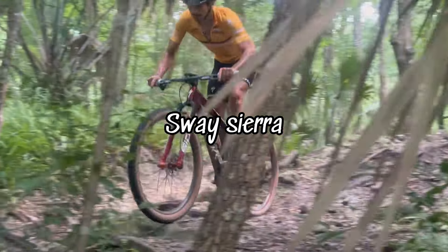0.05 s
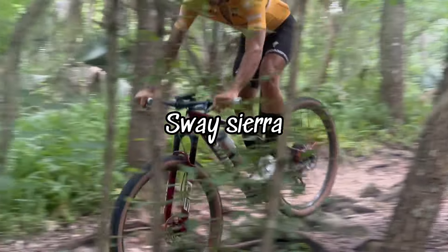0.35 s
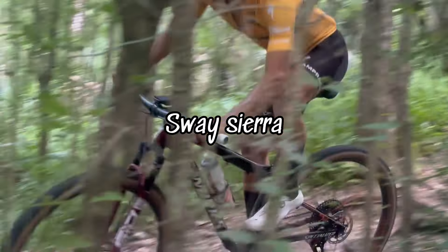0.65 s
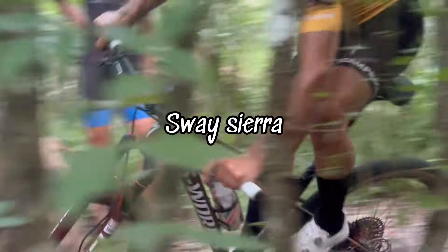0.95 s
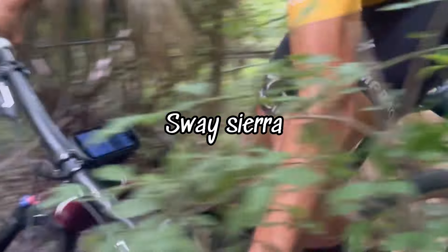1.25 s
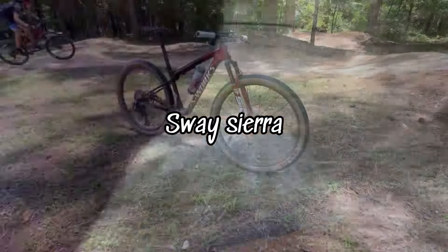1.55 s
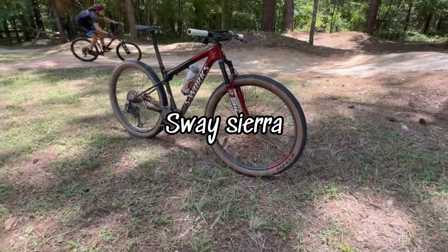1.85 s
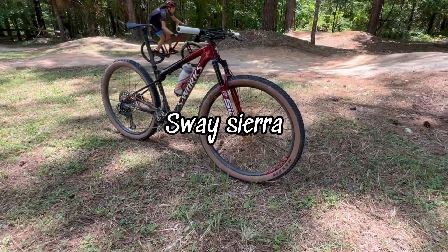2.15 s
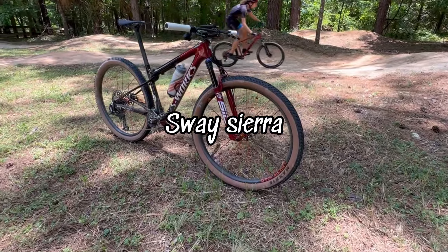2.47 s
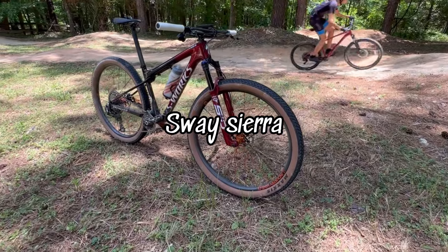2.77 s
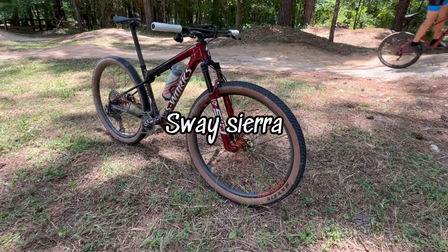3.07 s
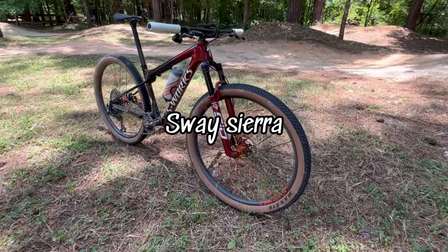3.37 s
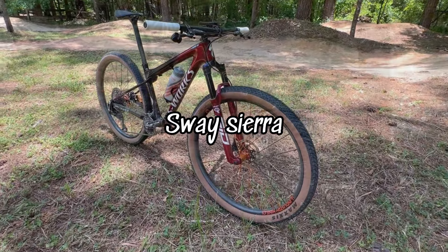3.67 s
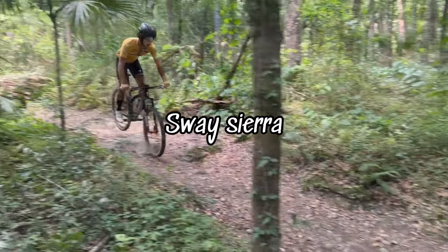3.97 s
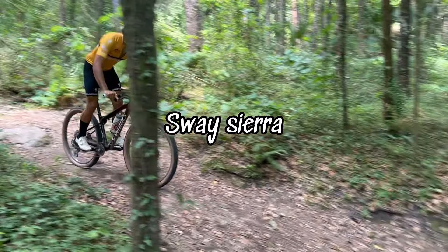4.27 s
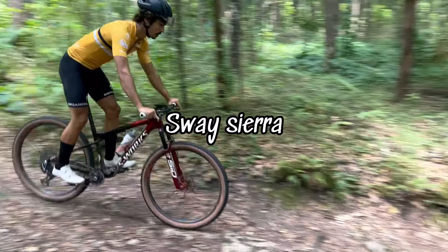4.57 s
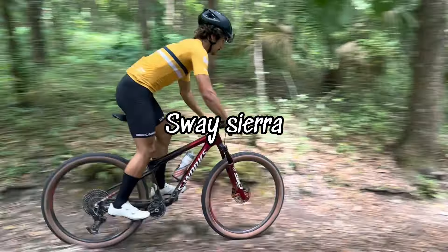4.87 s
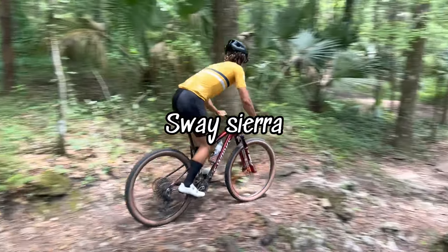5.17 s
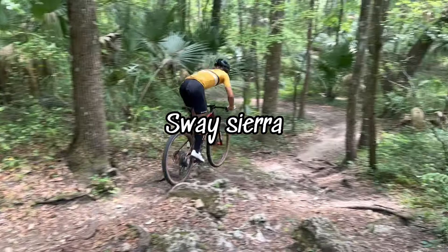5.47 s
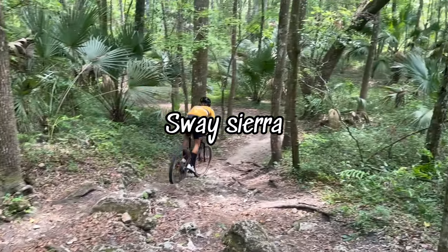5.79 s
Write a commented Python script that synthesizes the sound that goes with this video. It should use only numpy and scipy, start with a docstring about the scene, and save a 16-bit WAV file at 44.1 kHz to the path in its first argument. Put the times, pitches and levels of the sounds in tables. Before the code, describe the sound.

A mountain bike coasts close past the microphone on a forest trail, tyres rumbling and crunching grit, freehub buzzing, frame and chain clattering over roots. In a short lull, a farther bike rolls and ticks faintly while twigs snap under soft air in the leaves. Then comes a second close pass through dry leaves, with one very hard knock and thump before it fades.

```python
"""Mountain bikes on a forest trail

A bike coasts past twice: tyres rumble on dirt and crush grit, the freehub's pawls buzz, and roots
make the tyres thump and the frame clatter, once very hard. Twigs snap and the trees echo the hits.
In the lull a farther bike ticks across a clearing, under soft canopy air and a faint low rumble.
The second pass runs through dry leaves, with thin, brief metallic rings from the bike."""
import sys
import numpy as np
from scipy import signal
from scipy.fft import rfft, irfft, next_fast_len
from scipy.io import wavfile
from scipy.ndimage import uniform_filter1d, map_coordinates

SR = 44100
rng = np.random.default_rng(int(sys.argv[2]) if len(sys.argv) > 2 else 0)


def dump(signal):
    """Clip the signal to [-1, 1] and save it as 16-bit WAV at the path in sys.argv[1]."""
    limited = np.clip(np.atleast_2d(signal).T, -1, 1)
    pcm = np.round(limited * 32767).astype(np.int16)
    wavfile.write(sys.argv[1], SR, pcm)


N = 257103
TIME_S = np.arange(N) / SR


def amp(db):
    """Decibels to gain."""
    return 10 ** (np.asarray(db) / 20)


def unit(x):
    """Scale to rms 1."""
    return x / np.sqrt(np.mean(x ** 2) + 1e-20)


def along(points, hz):
    """Interpolate (Hz, value) points on a log frequency axis."""
    points_hz, values = np.transpose(points)
    return np.interp(np.log(hz + 1), np.log(points_hz), values)


def noise():
    """Two unrelated white noises."""
    return rng.standard_normal((2, N))


def grains(per_s, scatter_db):
    """Two streams of tiny random impacts of uneven size."""
    impacts = (rng.random((2, N)) < per_s / SR) * rng.choice([-1, 1], (2, N))
    return unit(impacts * amp(scatter_db * np.minimum(rng.exponential(size=(2, N)), 3)))


def wobble(per_s):
    """A smooth curve through per_s random knots a second."""
    return map_coordinates(rng.standard_normal(int(N * per_s / SR) + 4), [TIME_S * per_s])


def spell(start, end, edge_s):
    """Gate from start to end, with a ramp centred on each."""
    return np.clip(np.minimum(TIME_S - start, end - TIME_S) / edge_s + 0.5, 0, 1)


def add(track, start, sound):
    """Mix a sound in at start seconds."""
    part = track[..., max(round(start * SR), 0):][..., :sound.shape[-1]]
    part += sound[..., :part.shape[-1]]


def filtered(x, response):
    """Filter x by a function of frequency."""
    n = x.shape[-1]
    padded = next_fast_len(n + 8192)
    return irfft(rfft(x, padded) * response(np.fft.rfftfreq(padded, 1 / SR)), padded)[..., :n]


def coloured(x, spectrum):
    """Shape x by a (Hz, dB) spectrum, at rms 1."""
    return unit(filtered(x, lambda hz: amp(along(spectrum, hz))))


def resonance(hz, centre_hz, width_hz):
    """Causal response of one mode."""
    return 1j * hz * width_hz / (centre_hz ** 2 - hz ** 2 + 1j * hz * width_hz)


def band(x, centre_hz, width_hz):
    """Pass x twice through a resonance, at rms 1."""
    return unit(filtered(x, lambda hz: resonance(hz, centre_hz, width_hz) ** 2))


def spread(pair, likeness):
    """Mix two unrelated signals into left and right with a (Hz, correlation) curve."""
    def weights(hz):
        angle = np.arccos(np.clip(along(likeness, hz), -1, 1)) / 2
        return np.array([np.cos(angle), np.sin(angle)])
    mid, side = filtered(pair, weights)
    return np.array([mid + side, mid - side])


def patchy(x, depth_db):
    """Colour that shifts from moment to moment, as paths through the trees change."""
    spectra = signal.stft(x, nperseg=1024)[2]
    patches = uniform_filter1d(rng.standard_normal(spectra.shape[1:]), size=5, axis=0)
    patches = unit(uniform_filter1d(patches, size=7, axis=1))
    return signal.istft(spectra * amp(depth_db * patches), nperseg=1024)[1][:, :N]


def nearness(nearest_s, width_s):
    """One over distance for a bike riding straight by, 1 at its nearest."""
    return 1 / np.hypot(1, (TIME_S - nearest_s) / width_s)


# Ground patches. Each row: centre in seconds, half length in seconds, tyre load in dB, extra grit in dB.
GROUND = [(0.381, 0.027, -1.5, 3), (0.559, 0.075, 1.5, 5.5), (0.77, 0.26, 0, 0), (1.19, 0.09, 2, 2),
          (2.07, 0.08, -9.5, 11.5), (3.75, 0.0765, 10.5, -29.5), (4.062, 0.1386, 4.5, 5),
          (4.257, 0.113, 6, -1), (4.725, 0.094, 2.5, -1.5), (5.114, 0.053, -3, 4),
          (5.291, 0.0645, 11.5, -7), (5.711, 0.0214, -3.5, 8.5), (5.805, 0.0953, 10.5, -3.5)]
# Wheels going light. Each row: lift in seconds, touchdown in seconds, tread loss by then in dB.
HOPS = [(0.064, 0.371, 15), (3.838, 4.014, 28.5), (5.375, 5.682, 27.5)]

def contact(ride):
    """Gains of rumble, tread and grit on one pass, set by distance, rough ground and hops."""
    start, end, nearest_s, width_s = ride[:4]
    fade_s = 0.932
    fade = np.clip(np.minimum(TIME_S - start, end - TIME_S) / fade_s, 0, 1)
    load_db = loose_db = lift_db = 0
    for centre_s, half_s, press_db, grit_db in GROUND:
        patch = np.exp(-((TIME_S - centre_s) / half_s) ** 2)
        load_db += press_db * patch
        loose_db += grit_db * patch
    for up, down, loss_db in HOPS:
        lift_db += loss_db * np.clip((TIME_S - up) / (down - up), 0, 1) * spell(up, down, edge_s=0.011)
    gains = amp([load_db - 0.53 * lift_db, load_db - lift_db, load_db + loose_db - 0.365 * lift_db])
    return fade * nearness(nearest_s, width_s) * gains


# The near bike. Each row: start, end, nearest moment and distance over speed in seconds,
# then rumble, tread and grit in dB.
PASSES = [(-0.8958, 2.278, 1.141, 0.339, -39.5, -37, -41.5), (3.5, 6.718, 4.9293, 0.3216, -43, -39.5, -42)]
# Tyre spectra; tread and grit have one per pass. Each row: frequency in Hz, relative level in dB.
RUMBLE_SPECTRUM = [(12, -76), (22, -36), (32, -21), (52, -1), (110, 2), (170, -4.5), (260, -12.5),
                   (500, -20.5), (1200, -70.5)]
TREAD_SPECTRA = [
    [(30, -70), (80, -4.5), (170, -9), (250, 7.5), (370, -1), (460, 1), (700, 0.5), (1100, -8.5),
     (1800, -16.5), (5000, -28.5)],
    [(30, -72), (80, -35.5), (170, -11), (260, 3), (380, -6.5), (450, -2), (720, -2), (1100, -10),
     (1800, -23), (5000, -55.5)],
]
GRIT_SPECTRA = [
    [(100, -60.5), (500, -18), (1100, 10), (1350, 4), (1550, 9), (1900, 7.5), (2700, 1.5), (3600, 0),
     (6000, -4.5), (10000, -5.5), (16000, -5.5)],
    [(100, -60), (500, -62.5), (1100, 1.5), (1500, -2), (2100, 2.5), (2600, 3.5), (3700, -6), (5000, -11),
     (9000, -5.5), (16000, -28.5)],
]
# Stereo image, head-on then side-on. Each row: frequency in Hz, left-right correlation.
PASS_LIKENESS = [
    [(100, 0.992), (600, 0.948), (1100, 0.89), (1800, 0.033), (2400, 1), (6900, 1), (7500, -0.93),
     (8100, 0.99), (10000, -0.63)],
    [(100, 1), (250, 0.938), (650, 0.878), (1400, 0.77), (2400, 0.13), (6000, 0.064), (8500, 0.435)],
]

def tyres():
    """Knobs drum on uneven dirt and crush grit; every jolt presses the tread harder."""
    jolt = amp(1.4 * wobble(70))
    out = np.zeros((2, N))
    for i, ride in enumerate(PASSES):
        rumble, tread, grit = contact(ride) * amp(ride[4:])[:, None]
        knobs = noise() + 0.9 * grains(450, scatter_db=4)
        crumbs = noise() + 0.468 * grains(400, scatter_db=0.5)
        roll = rumble * amp(0.8 * wobble(25)) * coloured(noise(), RUMBLE_SPECTRUM)
        roll += tread * amp(1.57 * wobble(40)) * coloured(knobs, TREAD_SPECTRA[i])
        roll += grit * amp(1.95 * wobble(130)) * coloured(crumbs, GRIT_SPECTRA[i])
        out += spread(roll, PASS_LIKENESS[i])
    return patchy(jolt * out, depth_db=1.1)


def stone_crackle():
    """Single stones crack under the knobs on the first pass, each in a short, bright burst."""
    t = np.arange(SR // 80) / SR
    t60_s = 0.009
    stones = np.abs(grains(70, scatter_db=4.5)[0])
    bursts = signal.fftconvolve(stones, amp(-60 * t / t60_s))[:N]
    cracks = band(bursts * noise(), centre_hz=4750, width_hz=3740)
    grit = contact(PASSES[0])[2]
    return amp(-53) * grit * spread(cracks, PASS_LIKENESS[0])


def ratchet(rate_hz, t60_s):
    """Pawls drop off the teeth; each drop is a short burst of its own strength."""
    tooth = np.cumsum(rate_hz) / SR
    strength = amp(2 * rng.standard_normal(8192))[tooth.astype(int) % 8192]
    since_drop_s = (tooth % 1) / rate_hz
    return unit(noise() * strength * amp(-60 * since_drop_s / t60_s))


# Spells of coasting. Each row: start and end in seconds, level midway in dB, drift in dB per second,
# hub shell offset in dB, fade in seconds.
COASTS = [(-0.05, 0.419, -40, 18, -13, 0.035), (0.432, 0.47, -39, 0, -21, 0.0305),
          (0.47, 0.53, -51.5, 0, -14, 0.03), (0.527, 1.395, -40.5, -9, -11, 0.032),
          (1.385, 1.715, -54.5, -9, -9.5, 0.135), (1.683, 1.922, -60, 4, -16.5, 0.114),
          (1.916, 2.042, -51.5, -2.5, -18, 0.077), (3.45, 4.203, -49.5, 23, -7, 0.094),
          (4.197, 5.354, -42.5, -0.5, -12.5, 0.06), (5.34, 5.893, -42, -6, -8.5, 0.1)]
# Pawl sizzle. Each row: frequency in Hz, relative level in dB.
HUB_SPECTRUM = [(1200, -55.5), (3300, -30.5), (4500, -13.5), (6500, -7), (8400, -3.5), (10000, -5),
                (12200, -3.5), (14000, 2.5), (15000, 4.5), (16000, 1)]
# Hub stereo image. Each row: frequency in Hz, left-right correlation.
HUB_LIKENESS = [(2500, 0.84), (5500, 1), (7300, 0.099), (8500, 0.63), (10500, 0), (14000, 0)]

def freehub():
    """At speed the clicks merge into a sizzle, blurred by the trees; the hub shell sings along."""
    falloff = 0.847  # fades with distance more slowly than the tyres
    near = np.max([nearness(*ride[2:4]) for ride in PASSES], axis=0) ** falloff
    buzz, singing = np.zeros(N), np.zeros(N)
    for start, end, db, db_per_s, shell_db, fade_s in COASTS:
        drift_db = db_per_s * (TIME_S - (start + end) / 2)
        level = near * spell(start, end, fade_s) * amp(db + drift_db)
        buzz += level
        singing += level * amp(shell_db)
    clicks = ratchet(rate_hz=155 * (1 + 0.08 * wobble(5)), t60_s=0.012) + 1.2 * noise()
    blurred = patchy(clicks, depth_db=1.1)
    sizzle = amp(5 + 1.03 * wobble(45)) * buzz * coloured(blurred, HUB_SPECTRUM)
    shell = amp(1.74 * wobble(8.6)) * singing * band(clicks, centre_hz=2401, width_hz=660)
    return spread(sizzle + shell, HUB_LIKENESS)


# Canopy air. Each row: frequency in Hz, relative level in dB.
CANOPY_SPECTRUM = [(25, -60), (90, -25.5), (250, 4.5), (500, -1.5), (1100, 2.5), (1500, 0), (2100, -4),
                   (2600, 3.5), (3400, -2), (5000, -0.5), (7000, 3), (9000, -1.5), (12000, -25),
                   (16000, -28.5)]
# Stereo image of distant sounds. Each row: frequency in Hz, left-right correlation.
FAR_LIKENESS = [(150, 0.15), (400, 0.585), (1000, 0.14), (2400, 0.073), (15000, 0.015)]

def canopy():
    """Soft air moves through the leaves overhead."""
    leaves = patchy(noise(), depth_db=1.8)
    air = amp(-54 + 1.07 * wobble(4.465)) * coloured(leaves, CANOPY_SPECTRUM)
    return spread(air, FAR_LIKENESS)


def rattles():
    """Small random knocks that follow the tread's level, as rows for knocks()."""
    count, per_s, t60_s = 256, 19, 0.034
    tread = sum(contact(ride)[1] * amp(ride[5]) for ride in PASSES)
    timing, size, pitch = rng.random((count, 3)).T
    starts = (np.arange(count) + timing) / per_s
    tread_db = 20 * np.log10(np.interp(starts, TIME_S, tread) + 1e-9)
    levels_db = tread_db - 5 + 6 * size
    parts_hz = 400 * 4 ** pitch
    return [(s, db, t60_s, hz, db) for s, db, hz in zip(starts, levels_db, parts_hz) if s * SR < N]


# Blows from roots. Each row: start in seconds, strength in dB, chain rattle t60 in seconds,
# struck part's pitch in Hz, its ring in dB.
KNOCKS = [(0.37, -38.5, 0.028, 621, -39.5), (0.444, -31.5, 0.0333, 655, -31.5),
          (0.497, -35, 0.02, 626, -28), (0.513, -23.5, 0.0796, 970, -21.5), (0.522, -17, 0.05, 2308, -22.5),
          (0.524, -27, 0.0204, 677, -20), (0.534, -16.5, 0.0106, 263.6, -20.5),
          (0.592, -23.5, 0.022, 801, -32.5), (0.653, -27, 0.0262, 850, -33), (0.711, -30, 0.024, 696, -30),
          (0.723, -22, 0.0392, 593, -31), (0.733, -26, 0.0158, 1845, -25),
          (0.802, -22.5, 0.03, 613.4, -26.5), (0.814, -29.5, 0.022, 686, -30.5),
          (0.881, -19.5, 0.0154, 1412, -30), (0.953, -27.5, 0.0204, 665, -24),
          (0.967, -28, 0.081, 1830, -28.5), (1.030, -27, 0.039, 431.5, -24),
          (1.046, -26, 0.0416, 409, -28.5), (1.069, -21, 0.028, 523, -24),
          (1.099, -20.5, 0.0243, 1457, -26), (1.149, -24.5, 0.0304, 681, -25.5),
          (1.164, -34.5, 0.045, 301.6, -18.5), (1.226, -31.5, 0.028, 525, -20.5),
          (1.244, -25.5, 0.0265, 467, -21), (1.258, -25.5, 0.039, 270.4, -17),
          (1.268, -29, 0.027, 506, -27), (1.515, -29, 0.031, 379, -27.5), (1.710, -40, 0.0285, 604, -36),
          (1.756, -42.5, 0.019, 442, -39), (4.197, -27, 0.05, 484, -22), (4.322, -31, 0.0373, 437.5, -27.5),
          (4.348, -33.5, 0.039, 602, -27), (4.476, -31, 0.021, 633, -32.5), (4.572, -37, 0.031, 614, -27),
          (4.678, -28.5, 0.023, 893, -30), (4.772, -27.5, 0.0306, 785, -29.5),
          (4.855, -36, 0.03, 646, -30.5), (4.979, -28, 0.027, 613, -27.5), (5.253, -30.5, 0.108, 670, -22),
          (5.273, -14, 0.0222, 250, -12), (5.277, -5.5, 0.0366, 1346, -14.5),
          (5.284, -14, 0.0148, 690, -22), (5.817, -26, 0.065, 453, -32.5)]
# Frame modes. Each row: frequency in Hz, width in Hz, relative level in dB.
FRAME_MODES = [(267, 82.4, 20.5), (388, 135, 6.5), (701.4, 124, 15), (960, 20, -30), (1272.6, 28.5, 5.5),
               (1500, 32, 3), (1880, 157, 9.5), (2440, 66, -23), (2850, 95, -18), (3200, 79, -17.5),
               (4640, 510, -46), (5960, 120, -15)]
# Chain rattle. Each row: frequency in Hz, relative level in dB.
CHAIN_SPECTRUM = [(30, -39.5), (100, 11), (250, 2), (700, 3.5), (1000, 3), (1400, 5.5), (2000, 0.5),
                  (2800, 2.5), (3800, -13.5), (5400, -23), (7500, -59), (16000, -36)]

def knocks():
    """Each blow rings the frame and the part it strikes, and shakes a short rattle out of the chain."""
    def frame_response(hz):
        return sum((-1) ** k * amp(db) * resonance(hz, mode_hz, width_hz)
                   for k, (mode_hz, width_hz, db) in enumerate(FRAME_MODES))
    t = np.arange(SR // 4) / SR
    part_t60_s = 0.0433
    frame = filtered(1.0 * (t == 0), frame_response)
    frame /= np.abs(frame).max()
    blows, shake = np.zeros(N), np.zeros(N)
    for start, db, t60_s, part_hz, part_db in KNOCKS + rattles():
        add(blows, start + 0.002, amp(db - 1) * frame)
        part_envelope = amp(part_db - 60 * t / part_t60_s) * (1 - np.exp(-t / 0.00155))
        add(blows, start, part_envelope * np.sin(2 * np.pi * part_hz * t))
        add(shake, start - 0.0005, amp(db - 2 - 60 * t / t60_s) * (1 - np.exp(-t / 0.0016)))
    chain = shake * coloured(noise(), CHAIN_SPECTRUM)
    return blows + spread(chain, [(800, 1.0), (1300, 0.37), (1800, 0.68), (2500, 0.157), (4000, 0.145)])


# Echo decay. Each row: frequency in Hz, t60 in seconds.
ECHO_DECAY = [(200, 0.08), (2000, 0.459), (12000, 0.155)]

def trunk_echo(x):
    """Trees scatter a thin, short echo."""
    hz, t, spectra = signal.stft(rng.standard_normal((2, SR // 2)), SR, nperseg=256)
    decay = amp(-60 * t / along(ECHO_DECAY, hz)[:, None])
    tail = signal.istft(spectra * decay, SR, nperseg=256)[1]
    return signal.fftconvolve(x, tail / np.linalg.norm(tail[0]), axes=1)[:, :N]


# Tyre landings. Each row: start in seconds, level in dB, settled pitch in Hz, t60 in seconds,
# pitch sag time in seconds.
THUMPS = [(0.165, -20, 103.4, 0.0965, 0.01695), (0.203, -25, 100.3, 0.053, 0.0043),
          (0.533, -15, 118.4, 0.0634, 0.00702), (1.098, -15, 118, 0.04, 0.00554),
          (1.446, -18.5, 129.8, 0.0615, 0.0154), (4.203, -23.5, 84.9, 0.075, 0.00416),
          (4.922, -26, 80, 0.126, 0.00201), (5.275, -9, 124, 0.11, 0.005004),
          (5.309, -16, 81.4, 0.077, 0.0019), (5.340, -26, 142, 0.22, 0.00179),
          (5.817, -10, 83.1, 0.035, 0.00345)]

def thumps():
    """A squashed tyre booms; its pitch sags as the load comes off."""
    t = np.arange(SR // 2) / SR
    attack = 1 - np.exp(-t / 0.00774)
    out = np.zeros(N)
    for start, db, settled_hz, t60_s, sag_s in THUMPS:
        pitch_hz = settled_hz * (1 + 1.588 * np.exp(-t / sag_s))
        phase = 2 * np.pi * np.cumsum(pitch_hz) / SR
        boom = np.sin(phase) + 0.349 * np.sin(1.8 * phase) + 0.4 * np.sin(0.449 * phase)
        add(out, start, amp(db - 60 * t / t60_s) * attack * boom)
    return out


# Twigs and stones, and at 5.278 s the bright crack of the hardest blow. Each row: start in seconds, body in Hz,
# body in dB, edge in Hz, edge in dB, # edge width over its pitch, crumble t60 in seconds.
SNAPS = [(0.398, 854, -42.5, 4500, -45, 0.7, 0.048), (0.455, 1100, -32.5, 5000, -43, 0.74, 0.031),
         (0.968, 1880, -37.5, 3460, -37, 0.63, 0.031), (1.044, 1990, -35.5, 6000, -38, 0.75, 0.037),
         (1.069, 1500, -33.5, 2950, -47.5, 0.69, 0.023), (1.247, 2400, -38, 5640, -35, 1, 0.063),
         (1.419, 2300, -38, 6800, -31, 0.72, 0.025), (1.610, 1890, -34, 5200, -33, 1.57, 0.037),
         (2.850, 850, -39, 2900, -45, 0.81, 0.127), (2.869, 858, -35, 2740, -36.5, 0.9, 0.0426),
         (3.041, 5000, -51, 9400, -44, 1.0, 0.0096), (3.27, 513, -50, 3010, -55.5, 0.77, 0.045),
         (3.288, 1240, -40.5, 4040, -36, 0.313, 0.0155), (3.415, 1400, -49.5, 3900, -44.5, 0.9, 0.032),
         (3.522, 1400, -51.5, 4700, -39.5, 0.7, 0.0237), (3.734, 2500, -46, 5480, -40, 0.44, 0.072),
         (3.984, 1270, -50.5, 4530, -43, 1.3, 0.042), (4.213, 1265, -33.5, 5470, -27.5, 0.96, 0.117),
         (5.278, 1800, -23, 4880, -23.5, 0.48, 0.025), (5.314, 1300, -30, 2700, -32, 0.73, 0.047),
         (5.329, 2580, -30, 5460, -31.5, 0.69, 0.105), (5.356, 1300, -34.5, 3000, -37.5, 0.83, 0.066),
         (5.817, 1250, -43, 6260, -35.5, 0.86, 0.047)]

def snaps():
    """Dry twigs and small stones crack with a woody body and a bright edge, then crumble; the hardest blow of
    the frame cracks the same way."""
    t = np.arange(SR // 5) / SR
    out = np.zeros((2, N))
    for start, body_hz, body_db, edge_hz, edge_db, edge_width, t60_s in SNAPS:
        envelope = amp(-60 * t / 0.007) + 0.45 * amp(-60 * t / t60_s)
        burst = rng.standard_normal((2, len(t))) * envelope
        for centre_hz, db, width in ((body_hz, body_db, 1.2), (edge_hz, edge_db, edge_width)):
            crack = filtered(burst, lambda hz: resonance(hz, centre_hz, width * centre_hz) ** 3)
            onset_rms = np.sqrt(np.mean(crack[:, t < 0.003] ** 2))
            add(out, start, amp(db) * crack / onset_rms)
    return spread(out, [(1000, 1.0), (4000, 0.43)])


# The far bike's hub and tyres. Each row: frequency in Hz, relative level in dB.
FAR_HUB_SPECTRUM = [(300, -59.5), (1500, -4), (4000, 0.5), (6300, 8.5), (7700, -24), (9500, -5.5),
                    (12000, -11.5), (14000, -20), (16000, -19.5)]
FAR_TYRE_SPECTRUM = [(40, -68), (110, -38), (170, -10), (240, -2.5), (370, 0), (530, -3.5), (680, -2),
                     (1100, -17), (1800, -8), (6000, -19.5)]

def far_bike():
    """Across the clearing tyres roll, knobs hum on hard dirt and the hub sizzles through the trees."""
    passing = spell(1.05, 3.645, edge_s=0.55) * nearness(nearest_s=2.78, width_s=0.36)
    sizzle = amp(-59.5 + 1.4 * wobble(6.1)) * coloured(noise(), FAR_HUB_SPECTRUM)
    roll = amp(-53) * coloured(patchy(noise(), depth_db=0.5), FAR_TYRE_SPECTRUM)
    hum = amp(-56.5) * band(noise(), centre_hz=450.2, width_hz=50)
    return spread(passing * (sizzle + roll + hum), FAR_LIKENESS)


# Runs of ticks. Each row: start and end in seconds, ticks per second, slowing as a share per second,
# level in dB, centre in Hz, width in Hz.
TICK_RUNS = [(2.115, 2.306, 46, 0, -48.5, 7870, 3500), (2.511, 2.619, 39, 0, -48, 10000, 9500),
             (2.626, 2.86, 48, 0, -44.5, 9800, 10000), (3.017, 3.173, 32, 0, -50.5, 9500, 7900),
             (3.197, 3.53, 36, 0.6, -47, 9500, 9000)]

def far_ticks():
    """The slow wheel drops its pawls one by one: uneven ticks in runs that swell and fade."""
    t = np.arange(SR // 25) / SR
    t60_s, swell_db, scatter_db = 0.0235, 1.5, 1.5
    out = np.zeros((2, N))
    for start, end, per_s, slowing, db, centre_hz, width_hz in TICK_RUNS:
        even_s = np.arange(0, end - start, 1 / per_s)
        times = start + even_s * (1 + slowing * even_s / 2)
        bursts = band(rng.standard_normal((24, 2, len(t))), centre_hz, width_hz)
        for tick_s, chance, burst in zip(times[times < end], rng.standard_normal(len(bursts)), bursts):
            swell = np.sin(np.pi * (tick_s - start) / (end - start)) - 1
            tick_db = db + swell_db * swell + scatter_db * chance
            add(out, tick_s, burst * amp(tick_db - 60 * t / t60_s))
    return spread(out, [(4000, 0.67), (12000, 0.207)])


# Swells of low rumble. Each row: start and end in seconds, level in dB.
LOW_SWELLS = [(2.2, 2.33, -56), (2.33, 2.61, -61), (3.05, 3.672, -60)]
# Their spectrum. Each row: frequency in Hz, relative level in dB.
SWELL_SPECTRUM = [(25, -39.5), (50, -15), (100, -1), (170, 0), (300, -1), (700, -33.5)]

def low_swells():
    """A faint low rumble comes and goes in the lull."""
    level = sum(amp(db) * spell(start, end, edge_s=0.074) for start, end, db in LOW_SWELLS)
    return level * spread(coloured(noise(), SWELL_SPECTRUM), [(100, 0.215), (300, 0.44)])


# Tyres brushing dry leaves. Each row: start and end in seconds, level in dB.
BRUSHES = [(2.421, 2.524, -56), (3.019, 3.121, -53), (4.007, 4.269, -51), (5.705, 5.73, -56.5)]

def leaf_litter():
    """Leaves hiss where a tyre brushes them and crumple in a bright spray under the second pass."""
    grit = contact(PASSES[1])[2]
    crumpling = amp(-43) * grit ** 2.07  # swells faster than the grit
    brushing = sum(amp(db) * spell(start, end, edge_s=0.021) for start, end, db in BRUSHES)
    spray = band(noise() + grains(900, scatter_db=3), centre_hz=5974, width_hz=5120)
    flutter = amp(1.1 * wobble(60))
    leaves = flutter * np.hypot(crumpling, brushing) * unit(patchy(spray, depth_db=2.5))
    return spread(leaves, PASS_LIKENESS[1])


# Metallic rings. Each row: start and end in seconds, pitch in Hz, level in dB.
METAL_RINGS = [(4.734, 4.82, 8050, -48.5), (4.76, 4.98, 7000, -53), (4.992, 5.136, 7980, -50),
               (5.306, 5.368, 2703, -44.5), (5.556, 5.71, 2396, -55)]

def metal_rings():
    """Thin, brief metallic rings from the bike."""
    return sum(amp(db) * spell(start, end, edge_s=0.02) * band(noise(), hz, width_hz=hz / 75)
               for start, end, hz, db in METAL_RINGS)


def knob_blip():
    """Evenly spaced knobs strike firm ground for an instant: one faint, low blip."""
    pitch_hz = 255.5 * (1 + 0.02 * wobble(40))
    phase = 2 * np.pi * np.cumsum(pitch_hz) / SR
    envelope = spell(5.5, 5.5, edge_s=0.016)  # a triangle of half height
    return amp(-36 + 1.5 * wobble(50)) * envelope * unit(np.sin(phase))


def scene():
    """The first pass is dead ahead; on the second, tyres and frame reach the left ear first."""
    hits = knocks() + snaps()
    near = tyres() + stone_crackle() + leaf_litter() + thumps() + knob_blip() + metal_rings()
    near += hits + amp(-14.5) * trunk_echo(hits)
    side = np.array([[1], [-1]])
    pan_db, left_lead_s = 0.326, 0.0001315
    to_left = amp(pan_db * side) * filtered(near, lambda hz: np.exp(1j * np.pi * hz * side * left_lead_s))
    second_pass = TIME_S > PASSES[1][0]
    near = np.where(second_pass, to_left, near)
    return near + freehub() + far_bike() + far_ticks() + canopy() + low_swells()


def hollow(x, centre_hz, half_width_hz, depth):
    """A flat-bottomed dip in the spectrum; depth 1 removes its centre."""
    return filtered(x, lambda hz: 1 - depth * np.exp(-((hz - centre_hz) / half_width_hz) ** 4))


def record(dry):
    """The treble has hollows and an upper limit; a narrow dip joins on the first pass."""
    top_hz = 15870
    mid = hollow((dry[0] + dry[1]) / 2, centre_hz=11230, half_width_hz=720, depth=0.938)
    dipped = hollow(mid, centre_hz=7450, half_width_hz=196, depth=0.83)
    mid += spell(*PASSES[0][:2], edge_s=1) * (dipped - mid)
    side = hollow((dry[0] - dry[1]) / 2, centre_hz=16740, half_width_hz=3250, depth=1)
    return filtered(np.array([mid + side, mid - side]), lambda hz: hz < top_hz)


dry = scene()
out = record(dry)
dump(out)
```